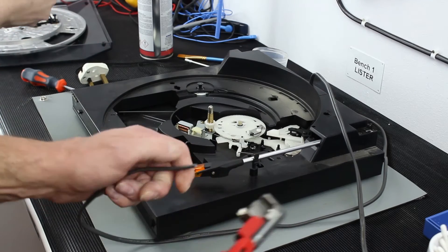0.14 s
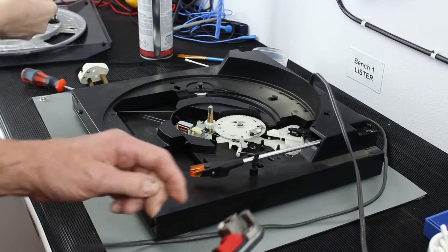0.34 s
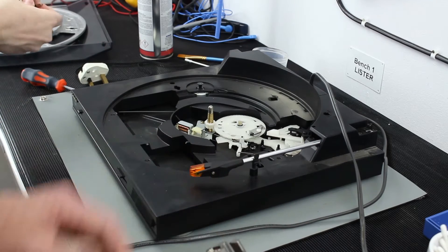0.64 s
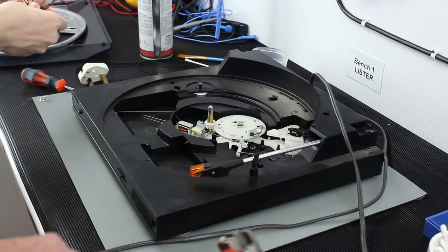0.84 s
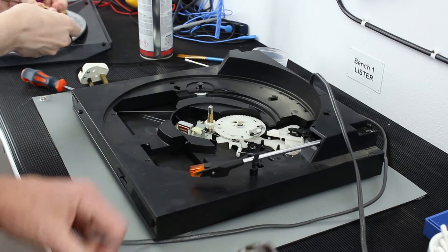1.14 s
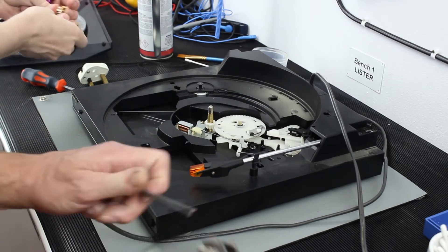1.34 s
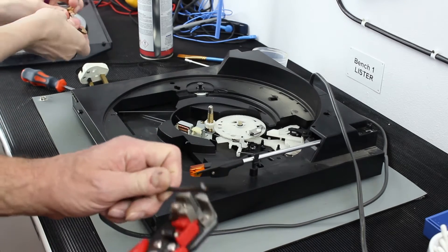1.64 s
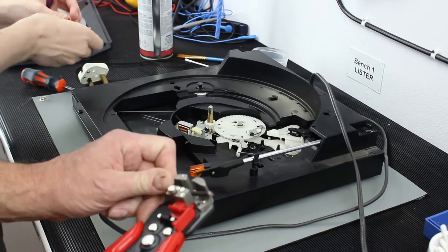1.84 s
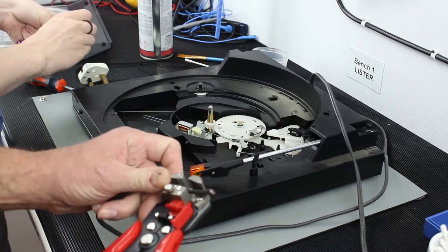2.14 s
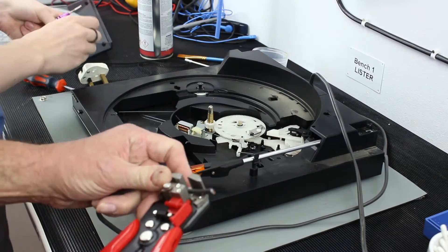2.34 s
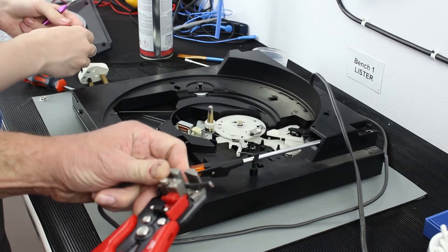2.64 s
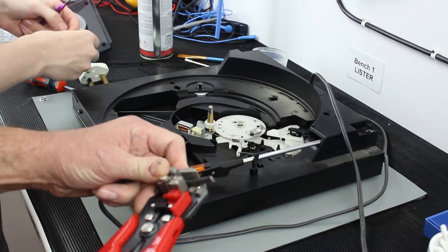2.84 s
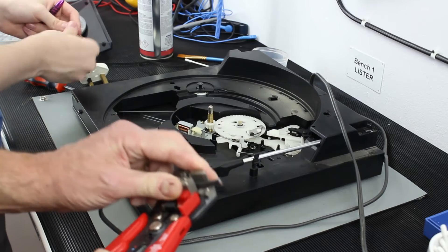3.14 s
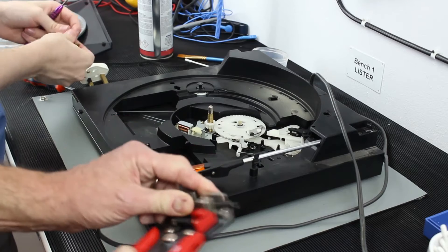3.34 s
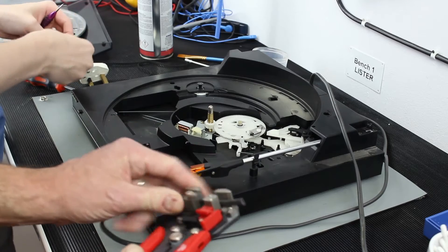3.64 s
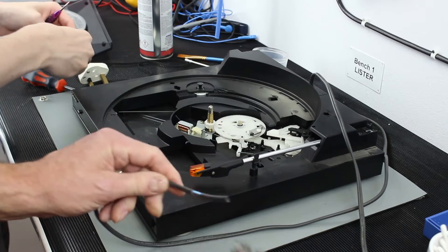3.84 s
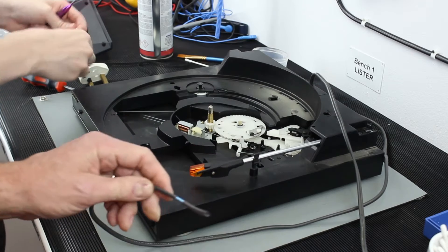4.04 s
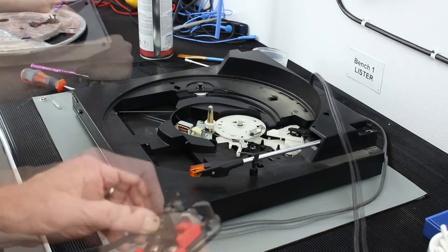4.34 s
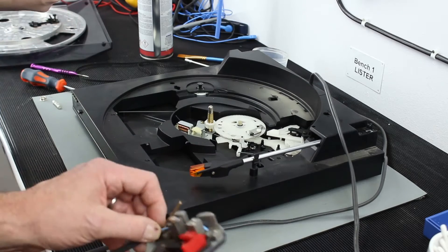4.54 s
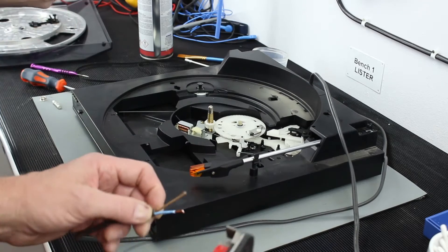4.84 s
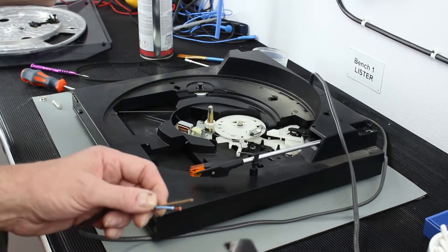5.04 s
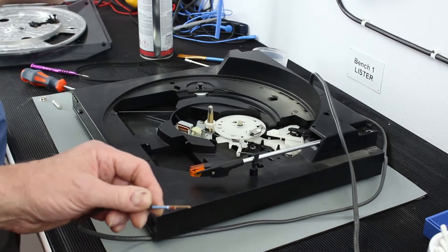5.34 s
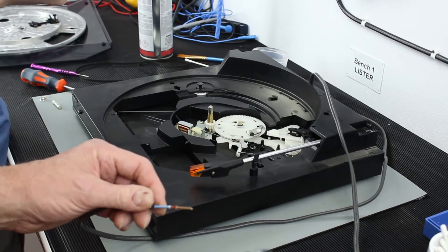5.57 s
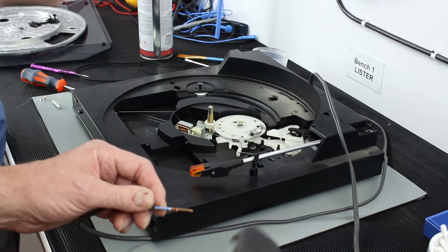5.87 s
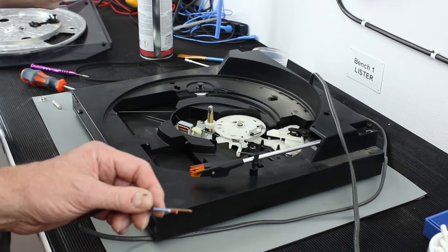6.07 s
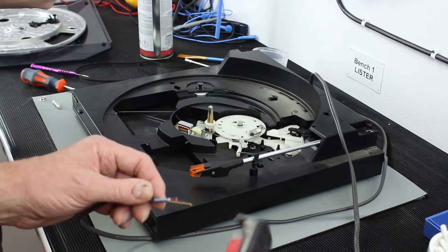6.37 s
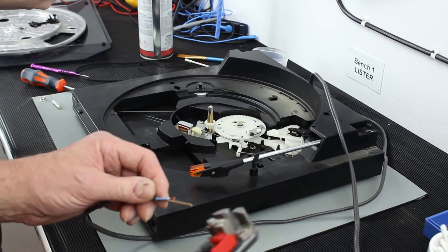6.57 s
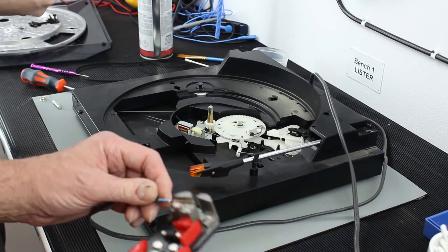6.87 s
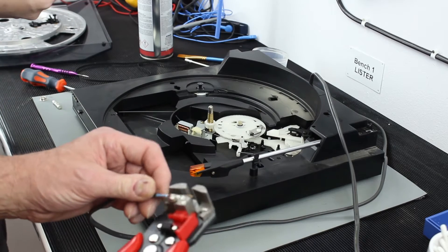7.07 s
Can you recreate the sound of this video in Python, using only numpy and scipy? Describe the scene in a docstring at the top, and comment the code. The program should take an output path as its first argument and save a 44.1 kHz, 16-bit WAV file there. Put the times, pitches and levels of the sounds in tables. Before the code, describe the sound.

Quiet workshop hiss with a dragging cord and soft taps, then sharp metallic snaps and rattling clicks from a hand wire stripper, ending in a clattering drop.

```python
"""Hand wire strippers on a workbench, small quiet room: soft taps and a dragged cord over steady hiss first.
From about 2.2 s a loose part pings, slips scrape and clicks gather; at 3.3 s ticks quicken as the jaws bite.
A low jolt, hard snaps and a thin spring ring follow; knocks cluster near 4 s, rattling snaps up to 5.7 s.
At 6.1 s the tool drops and rings; one scrape follows. Steel and wood are decaying modes, friction is shaped
noise; room tails are added and gain control ducks the whole mix after loud hits."""
import sys
import numpy as np
from scipy import signal
from scipy.io import wavfile
from scipy.ndimage import uniform_filter1d

SR = 44100
rng = np.random.default_rng(int(sys.argv[2]) if len(sys.argv) > 2 else 0)


def wrap_up_sound(samples):
    """Save the sound to the file named by the first command line argument, as 16-bit audio."""
    columns = np.atleast_2d(samples).T
    # keep every value between -1 and 1, then stretch to whole-number steps
    tamed = np.clip(columns, -1, 1)
    steps = np.round(tamed * 32767).astype(np.int16)
    wavfile.write(sys.argv[1], SR, steps)


N = 317961

# steel parts striking: t/s, level/dB, brightest ring f/Hz, chatter t60/s
CLICK_ROWS = [(0.381, -39, 3480, 0.15), (0.4361, -13.5, 2550, 0.018), (1.317, -23.5, 1210, 0.066),
              (1.816, -35.5, 5240, 0.055), (2.216, -17.5, 5000, 0.0057), (2.5188, -34.5, 2970, 0.039),
              (2.5722, -30, 2140, 0.013), (2.629, -15.5, 2980, 0.028), (2.719, -16.5, 5560, 0.022),
              (2.738, -17.5, 3100, 0.053), (2.7624, -18.5, 3080, 0.066), (2.768, -10.5, 3200, 0.018),
              (3.126, -24, 4700, 0.025), (3.4122, -4, 6050, 0.016), (3.418, -4, 3350, 0.019),
              (3.621, -16, 3900, 0.023), (3.697, -13.5, 3480, 0.23), (3.7178, 7.5, 5500, 0.034),
              (3.734, 3, 4200, 0.032), (3.758, 11, 5040, 0.024), (3.97, -1, 1980, 0.023),
              (4.013, -15.5, 4960, 0.079), (4.076, -21, 1590, 0.063), (4.101, -19, 4900, 0.1),
              (4.138, -4.5, 2380, 0.062), (4.1529, -16.5, 2340, 0.03), (4.19, -11.5, 2060, 0.05),
              (4.209, -9, 2200, 0.013), (4.248, -25.5, 1770, 0.016), (4.35, -13, 3620, 0.19),
              (4.3765, -4, 5200, 0.02), (4.4034, -27.5, 6340, 0.06), (4.577, -23.5, 4540, 0.034),
              (4.5907, -18, 3860, 0.035), (4.716, -30, 3940, 0.053), (4.764, -12.5, 4350, 0.036),
              (4.777, -7.5, 4170, 0.057), (4.8036, 5.5, 5700, 0.0084), (4.851, 9, 5050, 0.047),
              (5.113, -33.5, 3600, 0.15), (5.155, -28, 4000, 0.026), (5.162, -15.5, 5860, 0.052),
              (5.172, -7, 4450, 0.12), (5.1735, -7.5, 2370, 0.047), (5.1943, 10, 5240, 0.025),
              (5.2622, -10.5, 5760, 0.077), (5.2843, 5, 5540, 0.022), (5.336, -18.5, 3000, 0.027),
              (5.345, -6, 5000, 0.066), (5.3489, -6, 6200, 0.021), (5.3807, 1.5, 4600, 0.018),
              (5.439, -18, 4180, 0.095), (5.4718, -4, 3920, 0.034), (5.4795, -5.5, 5140, 0.027),
              (5.4968, -15, 6240, 0.16), (5.5255, -20, 2500, 0.039), (5.5344, -8, 3150, 0.05),
              (5.5522, -0.5, 5750, 0.015), (5.5674, 9.5, 5280, 0.0063), (5.6429, -9.5, 4040, 0.081),
              (5.6539, -8, 5930, 0.13), (5.6656, 9.5, 5080, 0.012), (5.68, -10, 6050, 0.023),
              (6.0836, -2, 4000, 0.016), (6.1025, 4, 2120, 0.011), (6.1062, -2.5, 4200, 0.037),
              (6.176, -19.5, 2170, 0.076), (6.2047, -15, 1780, 0.015), (6.2782, -27.5, 1770, 0.024)]
# free ringing as the released tool lands: t/s, level/dB
DROP_ROWS = [(6.0818, 4.5), (6.084, 2), (6.0966, 3)]
# free modes of the whole tool: f/Hz, level/dB, t60/s
TOOL_MODES = [(2800, 0.5, 0.027), (3800, -4.5, 0.029), (4370, 9.5, 0.02), (4453, 2.5, 0.043),
              (4860, 8, 0.018)]
# nudges of a small loose part: t/s, level/dB
PING_ROWS = [(2.2448, -29.5), (2.2499, -21)]
# modes of the loose part: f/Hz, level/dB, t60/s
PART_MODES = [(2972, 0, .018), (3187, -1, .018), (5303, -9, .02)]
# return spring let go by a snap: t/s, level/dB
SPRING_ROWS = [(3.761, -41), (6.1, -40)]
# jaws or fingers slipping on insulation:
# start t/s, strongest t/s, end t/s, level/dB, centre f/Hz, width/Hz, mean rate/(slips/s)
SCRAPE_ROWS = [(2.556, 2.567, 3.14, -55.5, 1753, 60, 300), (2.89, 2.946, 3.12, -47, 4500, 2520, 340),
               (2.96, 2.964, 3.04, -45.5, 890, 895, 730), (3.31, 3.4, 3.434, -43, 7260, 8000, 9000),
               (6.485, 6.565, 6.66, -53, 3050, 3520, 410)]
# blows on the bench top: t/s, level/dB, upper modes re lower modes/dB
KNOCK_ROWS = [(0.376, -36, 6), (0.777, -30.5, -8.5), (0.834, -28.5, 3.5), (0.897, -32.5, -1),
              (1.314, -29.5, -6), (2.516, -37.5, 3), (2.979, -34, 1), (3.411, -23, 8), (3.969, 7.5, -11),
              (4.018, -6.5, -41), (4.074, -19.5, 9), (4.139, -1.5, -10), (4.21, -3, -7), (4.347, -31, 5),
              (4.43, -35, 8), (4.491, -35, 30), (6.085, -9, -2), (6.106, 5.5, -6), (6.176, -17, -7),
              (6.205, -13, 4), (6.278, -22, -1.5)]
# wooden top, two lower modes first: f/Hz, level within its group/dB, t60/s
BENCH_MODES = [(152, 2, 0.1), (186, 6, 0.051), (299, -7, 0.053), (405, -10.5, 0.075), (524, -3, 0.036),
               (605.4, -7.5, 0.036)]
# bench frame, a beating pair lowest: f/Hz, level/dB, t60/s
FRAME_MODES = [(28.76, -7, 0.78), (30.42, -4.5, 1.7), (56.6, 9.5, 0.48)]
# cord drag: t/s, rubbing level/dB, bench hum level/dB
DRAG_POINTS = [(.1, -82, -78), (.35, -49.5, -47.5), (.95, -53, -53), (1.1, -69, -59), (1.352, -55, -52.5),
               (1.85, -59, -76), (2.4, -61.5, -61), (2.55, -56.5, -49), (3.1, -58, -55.5),
               (3.5, -52, -51.5), (3.9, -51.5, -59), (4.05, -50.5, -31), (4.5, -51, -66),
               (4.7, -53.5, -100), (6.0, -72.5, -58.5), (6.201, -61.5, -40.5), (6.501, -61.5, -59)]
# rub spectrum: f/Hz, relative level per Hz/dB
RUB_SPECTRUM = [(1000, -0.5), (2400, -5), (3900, -1.5), (5500, 1.5), (7000, -15), (10000, -40)]
# narrow rings in the rub: f/Hz, width/Hz, level/dB
RUB_RING_BANDS = [(5540, 180, -7.5), (2300, 820, -6)]
# bench hum under the drag: f/Hz, width/Hz, relative level/dB
HUM_BANDS = [(303.4, 17, 9.5), (473, 160, 5)]
# hiss spectrum: f/Hz, relative level per Hz/dB
HISS_SPECTRUM = [(25, -26), (50, 7.5), (200, -2), (600, -12), (700, -18), (1000, -14.5), (3300, -21),
                 (6000, -20.5), (15500, -21.5), (16000, -41)]
# room decay: f/Hz, t60/s
ROOM_DECAY = [(300, 0.22), (1500, 0.17), (3000, 0.15), (5500, 0.19), (9000, 0.15), (14000, 0.1)]
# thin steady dips in the output: f/Hz, width/Hz, depth/(0-1)
DIPS = [(1055, 50, .6), (3950, 70, .75), (7750, 70, .55)]

# click rules: dB at 0 dB strength, dB per dB of strength, dB per octave above MID_HZ
EDGE_RULE, DULL_RULE, MID_HZ = (-8.5, 0.21, 5.8), (-22.5, -0.23, -3.5), 4550
JAW_MODE_COUNT, JAW_SPREAD_OCTAVES, JAW_T60_S = 18, 0.45, 0.007  # damped by the grip
RING_DB_PER_OCTAVE, RING_HZ = 12.0, 2700  # lower clicks ring the jaws less
SPOT_MIN_WIDTH_HZ = 1500  # low clicks are broad, not tuned
CHATTER_RISE_S, CHATTER_SPREAD_DB = 0.0006, 3.8
# change when a click coincides with a firm blow: top edge, dull knock, jaw ring
ON_BENCH_DB, FIRM_BLOW_DB, COINCIDE_S = (2.5, 10.5, 3), -23, 0.008

BITE_START_S, BITE_END_S = 3.2575, 3.405
BITE_FIRST_GAP_S, BITE_MIN_GAP_S, BITE_GAP_RATIO = 0.039, 0.0101, 0.65
BITE_DB, BITE_RISE_DB, BITE_HZ, BITE_T60_S = -35.5, 12, 2870, 0.015
BITE_EDGE_DB = 7  # the tearing sheath has a brighter edge
SPRING_HZ, SPRING_T60_S = 8082, 0.2

SLAP_DB, SLAP_DB_PER_DB, SLAP_DECAY_S = -19.5, -0.48, 0.0064  # soft blows are thinner
SWAY_MAX_DB, SWAY_FULL_BLOW_DB, SWAY_DB_PER_DB = -28, -7.5, 1
JOLT_S, JOLT_DB, JOLT_HZ, JOLT_T60_S = 3.417, -22, 72, 0.07
HISS_DB = -50.5
START_POWER_DB, THRESHOLD_DB, RECOVERY_DB_PER_S = -13.5, -24.5, 54.7
TOP_HZ = 16500


def amp(db):
    """Decibels to amplitude."""
    return 10 ** (np.asarray(db) / 20)


def evened(x):
    """Scale to unit RMS."""
    return x / np.sqrt(np.mean(x ** 2) + 1e-20)


def topped(x):
    """Scale to unit peak."""
    return x / (abs(x).max() + 1e-20)


def read(points, hz):
    """Interpolate a spectrum over log frequency."""
    f, value = np.transpose(points)
    return np.interp(np.log(hz + 1), np.log(f + 1), value)


def add(mix, s, sound):
    """Add a sound in place at s seconds, cut at the end of the mix."""
    part = mix[round(s * SR):][:len(sound)]
    part += sound[:len(part)]


def band(x, lo_hz, hi_hz, order=2):
    """Butterworth band-pass, upper edge held below Nyquist."""
    edges_hz = [lo_hz, min(hi_hz, 0.49 * SR)]
    return signal.sosfilt(signal.butter(order, edges_hz, "band", fs=SR, output="sos"), x)


def resonate(x, hz, width_hz):
    """Two-pole resonance of gain 1."""
    return signal.lfilter(*signal.iirpeak(hz, hz / max(width_hz, 1), SR), x)


def sine(hz, t):
    return np.sin(2 * np.pi * hz * t)


def decay(t, t60):
    """Exponential fall of 60 dB in t60."""
    return amp(-60 * t / t60)


def rise(t, rise_s):
    return 1 - np.exp(-t / rise_s)


def noise(spectrum, patchy_db):
    """Random short-time spectra of a given colour, levelled by drifting patches."""
    hz = np.fft.rfftfreq(1024, 1 / SR)
    real, imag, patches = rng.standard_normal((N // 256 + 5, 513, 3)).T
    patches = evened(uniform_filter1d(uniform_filter1d(patches, 12, 0), 8, 1))
    spectra = (real + 1j * imag) * amp(read(spectrum, hz)[:, None] + patchy_db * patches)
    return evened(signal.istft(spectra, nperseg=1024, noverlap=768)[1][:N])


def click(db, hz, t60, landed, bright_db):
    """A sharp contact plus loose-part chatter drives jaw modes, scattered anew by grip and opening."""
    t = np.arange(4096) / SR
    octaves = np.log2(hz / MID_HZ)
    edge_db, dull_db = (a + b * db + c * octaves for a, b, c in (EDGE_RULE, DULL_RULE))
    ring_db = RING_DB_PER_OCTAVE * min(np.log2(hz / RING_HZ), 0)
    edge_db, dull_db, ring_db = np.array([edge_db, dull_db, ring_db]) + landed * np.array(ON_BENCH_DB)

    steps_db = CHATTER_SPREAD_DB * rng.standard_normal(len(t) // 32).repeat(32)
    chatter = rng.standard_normal(len(t)) * amp(steps_db)
    drive = 0.42 * chatter * decay(t, max(t60, 0.003)) * rise(t, CHATTER_RISE_S)
    drive[0] += 1.1  # the contact

    scatter = JAW_SPREAD_OCTAVES * rng.standard_normal((JAW_MODE_COUNT, 1))
    modes_hz = max(hz, RING_HZ) * 2 ** scatter
    jaw_response = decay(t, JAW_T60_S) * sine(modes_hz, t).sum(0)
    rung = signal.fftconvolve(drive, jaw_response)[:len(t)]
    spot = resonate(drive, hz, max(0.5 * hz, SPOT_MIN_WIDTH_HZ))
    spot = resonate(spot, hz, max(0.59 * hz, SPOT_MIN_WIDTH_HZ))

    steel = 0.24 * amp(ring_db) * topped(band(rung, 0.5 * hz, SR))
    steel = steel + 0.72 * topped(band(spot, 0.5 * hz, SR))
    steel = steel + 0.82 * amp(ring_db) * topped(band(drive, 1960, 6830, order=3))
    steel = topped(steel)
    dull = amp(dull_db) * topped(band(drive * rise(t, 0.0077), 950, 2410, order=3))
    edge = amp(edge_db + bright_db) * topped(band(drive, 8570, 12000))
    return amp(db) * (steel + dull + edge)


def bites():
    """Click rows as jaws bite through the sheath: quickening to a shortest gap, growing louder."""
    s, gap_s, rows = BITE_START_S, BITE_FIRST_GAP_S, []
    while s < BITE_END_S:
        progress = (s - BITE_START_S) / (BITE_END_S - BITE_START_S)
        rows.append((s, BITE_DB + BITE_RISE_DB * progress, BITE_HZ, BITE_T60_S))
        s += gap_s
        gap_s = max(gap_s * BITE_GAP_RATIO, BITE_MIN_GAP_S)
    return rows


def drop(db, modes, rattle_s):
    """Free modes of a struck part, shaken by a decaying noise rattle; each strike varies."""
    t = np.arange(4096) / SR
    chance = rng.standard_normal((len(modes), 2))
    free = 0
    for (hz, mode_db, t60), (level, tune) in zip(modes, chance):
        free = free + amp(mode_db + 2.2 * level) * decay(t, t60) * sine(hz * (1 + 0.013 * tune), t)
    rattle = rng.standard_normal(len(t)) * np.exp(-t / rattle_s)
    return amp(db) * topped(signal.fftconvolve(free, rattle)[:len(t)])


def spring(db):
    """One thin high mode swells in and decays."""
    t = np.arange(SR // 2) / SR
    return amp(db) * decay(t, SPRING_T60_S) * rise(t, 0.013) * sine(SPRING_HZ, t)


def scrape(start, top, end, db, hz, width_hz, rate):
    """Stick-slip: uneven ticks over a faint rub, coloured by a resonance and a broad band."""
    phase = np.interp(np.arange(start, end, 1 / SR), [start, top, end], [0, 1, 0])
    swell = np.sin(np.pi / 2 * phase) ** 2
    n = len(swell)
    pressure = amp(3.5 * evened(uniform_filter1d(rng.standard_normal(n), 600)))
    slip_rate = rate * rng.exponential(1, n // 64 + 1).repeat(64)[:n]
    slip_count = np.floor(np.cumsum(slip_rate / SR))
    slips = np.diff(slip_count, prepend=0) * rng.uniform(0.39, 1, n)
    slips = slips + 0.036 * rng.standard_normal(n)
    ringing = resonate(resonate(slips, hz, width_hz), hz, 2 * width_hz)
    broad = width_hz / 10000 * band(slips, 1340, 2 * hz)
    return amp(db) * swell * pressure * evened(ringing + broad)


def knock(db, upper_db):
    """An uneven push over milliseconds slaps and rings the wooden top and sways the frame."""
    t = np.arange(SR) / SR
    rings = []
    for hz, mode_db, t60 in BENCH_MODES:
        detuned_hz = hz * (1 + 0.031 * rng.standard_normal())
        rings.append(amp(mode_db) * decay(t, t60) * sine(detuned_hz, t))
    u, grit = t[:1500], rng.standard_normal(1500)
    push = u * np.exp(-u / 0.0031) * (1 + 2.1 * grit)
    low = topped(band(signal.fftconvolve(sum(rings[:2]), push)[:len(t)], 110, 700))
    starts = rng.integers(0, 120, len(BENCH_MODES) - 2)  # samples, each upper mode its own
    upper = sum(np.roll(ring, k) for ring, k in zip(rings[2:], starts))
    upper = topped(upper * rise(t, 0.0051) ** 2)
    wood = topped(band(low + amp(upper_db) * upper, 160, 800))

    slap = rng.standard_normal(len(t)) * np.exp(-t / SLAP_DECAY_S) * rise(t, 0.006)
    slap = amp(SLAP_DB + SLAP_DB_PER_DB * db) * topped(band(slap, 500, 1490, order=3))
    sway = sum(amp(d) * decay(t, t60) * sine(hz, t) for hz, d, t60 in FRAME_MODES)
    sway = sway * rise(t, 0.0084) * (1 - t)  # faded out by 1 s
    sway_db = SWAY_MAX_DB + SWAY_DB_PER_DB * min(db - SWAY_FULL_BLOW_DB, 0)
    return amp(db) * (wood + slap) + amp(sway_db) * sway


def jolt():
    """The cord snaps and jolts the bench: one decaying low sine."""
    t = np.arange(SR // 5) / SR
    return amp(JOLT_DB) * decay(t, JOLT_T60_S) * sine(JOLT_HZ, t)


def drag():
    """Friction grains under the cord, with two rings; the same grains hum the bench."""
    s, *columns = np.transpose(DRAG_POINTS)
    rub_db, hum_db = (np.interp(np.arange(N) / SR, s, c) for c in columns)
    grain = amp(2.0 * evened(uniform_filter1d(rng.standard_normal(N), 200)))
    white = grain * rng.standard_normal(N)
    hum = sum(amp(d) * evened(resonate(white, f, w)) for f, w, d in HUM_BANDS)
    rings = sum(amp(d) * evened(resonate(white, f, w)) for f, w, d in RUB_RING_BANDS)
    rub = evened(evened(grain * noise(RUB_SPECTRUM, patchy_db=1.5)) + rings)
    return amp(rub_db) * rub + amp(hum_db) * evened(hum)


def room(x):
    """Dense tails with per-band decay; three random patterns take turns, so the tail's colour varies."""
    turn, out = np.arange(N) / SR * 2 * np.pi * 2.3, 0
    for k in range(3):
        burst = rng.standard_normal(SR // 2) * (np.arange(SR // 2) > 150)  # predelay in samples
        hz, t, z = signal.stft(burst, SR, nperseg=128)
        fall = decay(t, read(ROOM_DECAY, hz)[:, None])
        tail = signal.istft(z * fall, SR, nperseg=128)[1]
        share = np.sqrt(2 / 3) * np.cos(turn + k * np.pi / 3)
        out = out + signal.fftconvolve(x * share, tail / np.linalg.norm(tail))[:N]
    return out


def hiss():
    """Steady coloured background noise, slightly patchy."""
    return amp(HISS_DB) * noise(HISS_SPECTRUM, patchy_db=0.6)


def scene():
    """Place all events, add room and background; only some hiss differs between the ears."""
    hits, bench = np.zeros((2, N))
    for s, *row in CLICK_ROWS + bites():
        landed = any(abs(s - blow) < COINCIDE_S and db > FIRM_BLOW_DB for blow, db, _ in KNOCK_ROWS)
        bright_db = BITE_EDGE_DB * (BITE_START_S <= s < BITE_END_S)
        add(hits, s, click(*row, landed, bright_db))
    for s, db in DROP_ROWS:
        add(hits, s, drop(db, TOOL_MODES, rattle_s=0.00055))
    for s, db in PING_ROWS:
        add(hits, s, drop(db, PART_MODES, rattle_s=0.0042))
    for s, db in SPRING_ROWS:
        add(hits, s, spring(db))
    for row in SCRAPE_ROWS:
        add(hits, row[0], scrape(*row))
    for s, *row in KNOCK_ROWS:
        add(bench, s, knock(*row))
    add(bench, JOLT_S, jolt())

    mid = hits + amp(-8.0) * room(hits) + bench + amp(-12.5) * room(bench) + drag() + hiss()
    side = amp(-5.5) * band(hiss(), 450, SR)
    return np.array([mid + side, mid - side])


def record(dry):
    """Gain control, initially low as after a hit, ducks after loud hits; then dips, clipping, low-pass."""
    power_db = 10 * np.log10(abs(uniform_filter1d((dry ** 2).mean(0), 600)) + 1e-12)
    power_db[0] = START_POWER_DB
    fall_db = np.arange(N) * RECOVERY_DB_PER_S / SR
    held_db = np.maximum.accumulate(power_db + fall_db) - fall_db  # instant rise, linear fall
    over_db = np.maximum(held_db - THRESHOLD_DB, 0)
    smooth_db = signal.lfilter([0.002], [1, -0.998], over_db, zi=[over_db[0]])[0]
    out = dry / amp(0.5 * smooth_db)  # half the excess is taken off
    for hz, width_hz, depth in DIPS:
        out = out - depth * resonate(out, hz, width_hz)
    low_pass = signal.firwin(511, TOP_HZ, window=("kaiser", 9), fs=SR)
    return signal.oaconvolve(np.clip(out, -1, 1), low_pass[None], "same")


dry = scene()
out = record(dry)
wrap_up_sound(out)
```